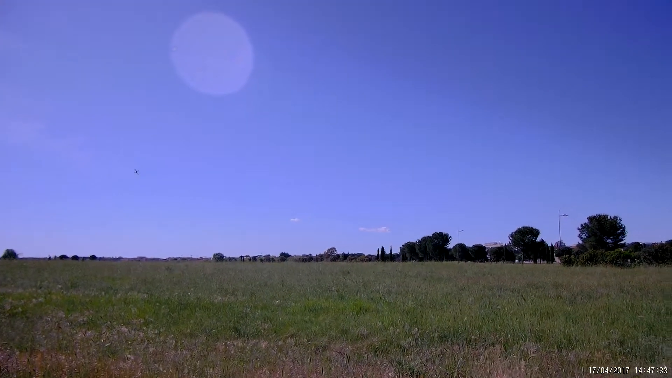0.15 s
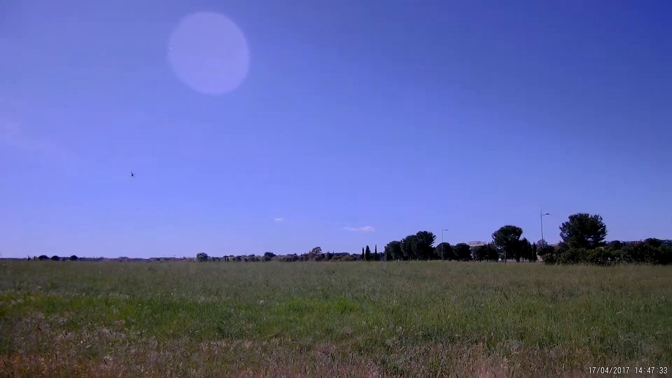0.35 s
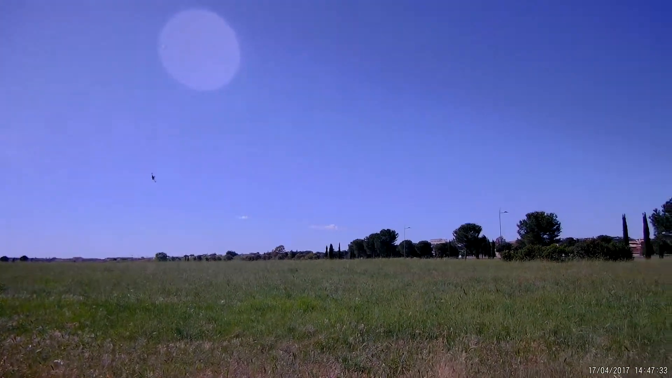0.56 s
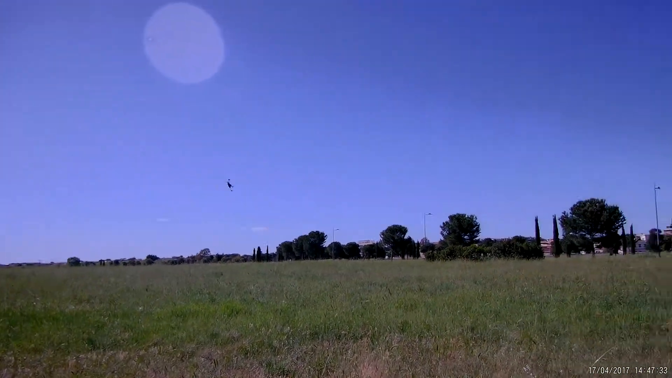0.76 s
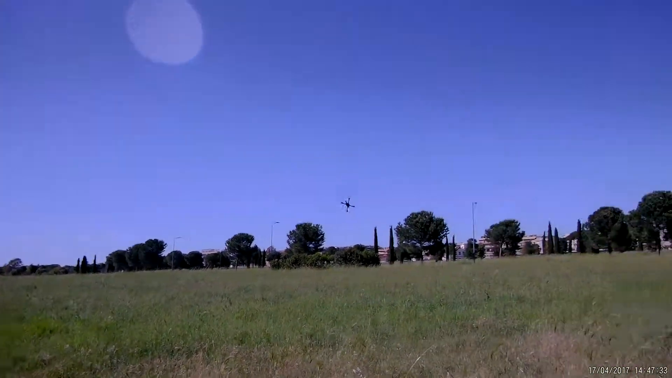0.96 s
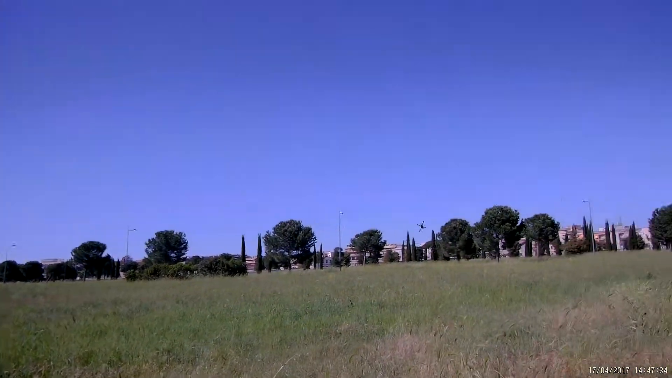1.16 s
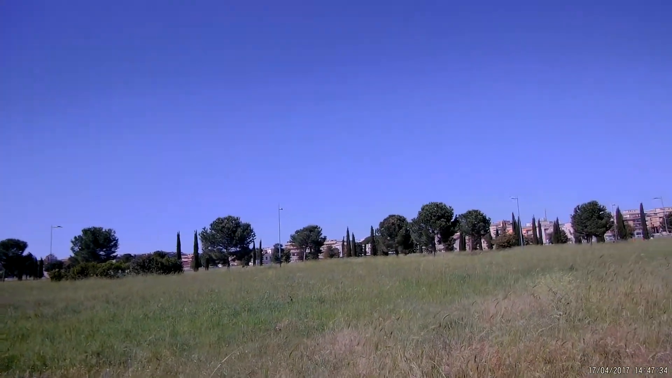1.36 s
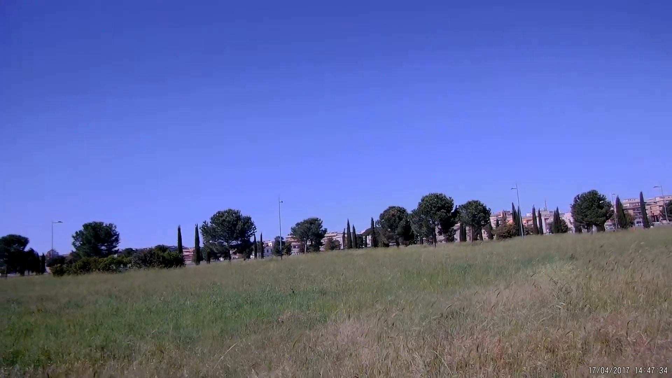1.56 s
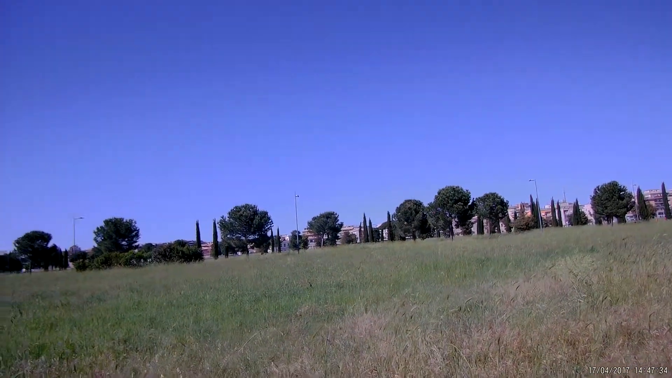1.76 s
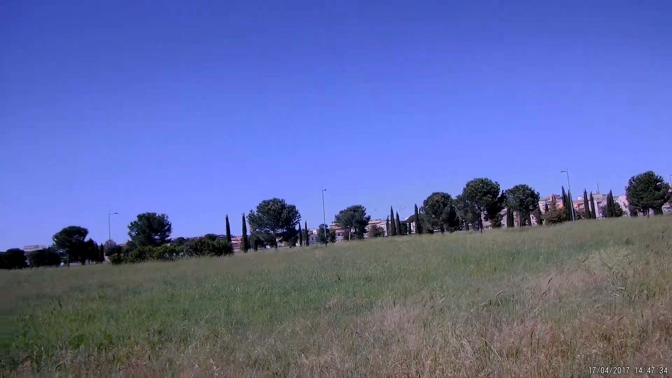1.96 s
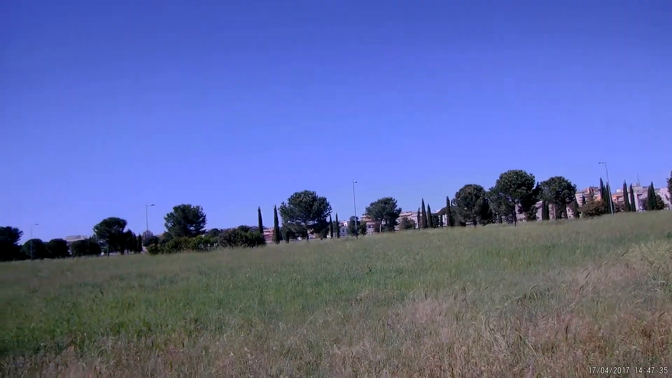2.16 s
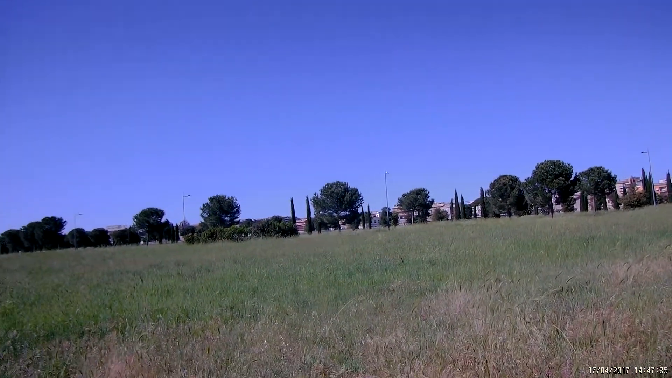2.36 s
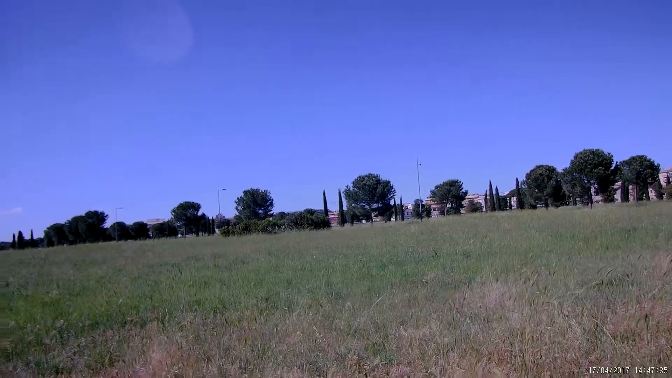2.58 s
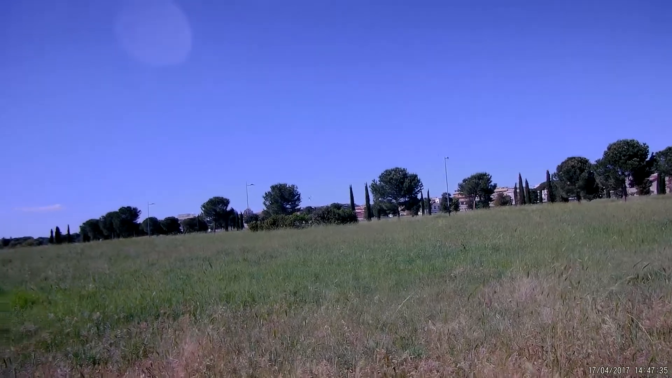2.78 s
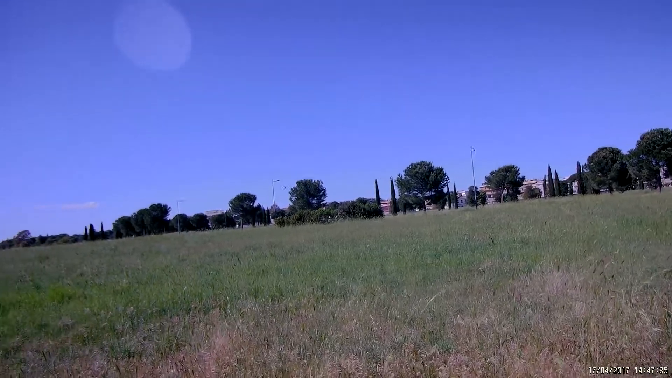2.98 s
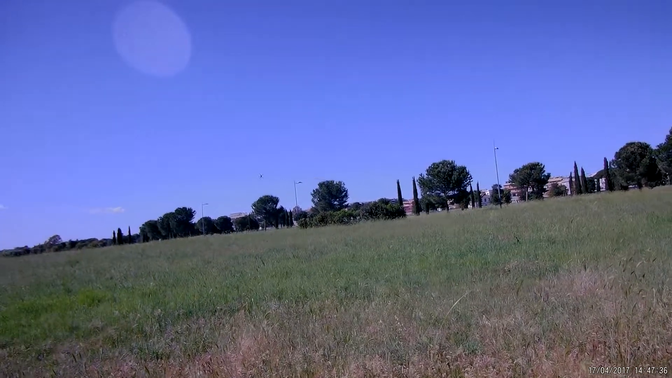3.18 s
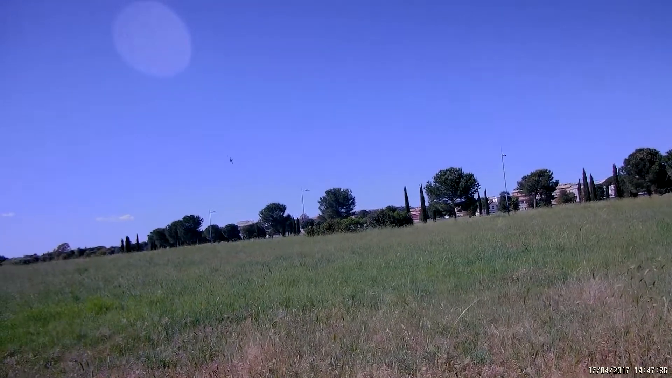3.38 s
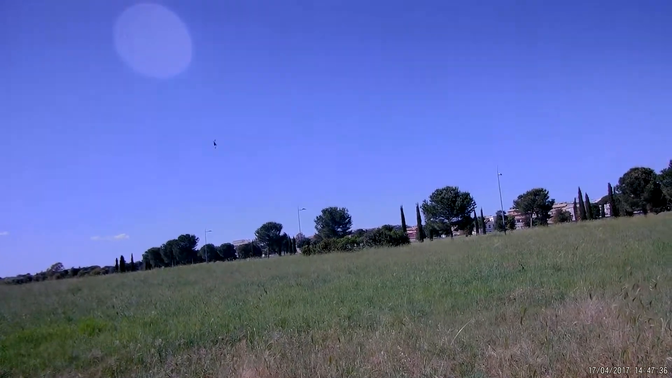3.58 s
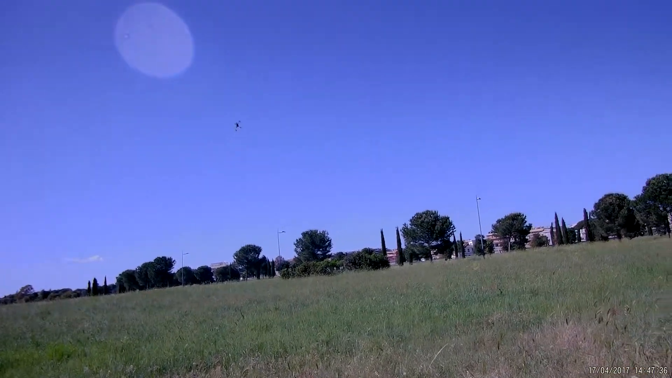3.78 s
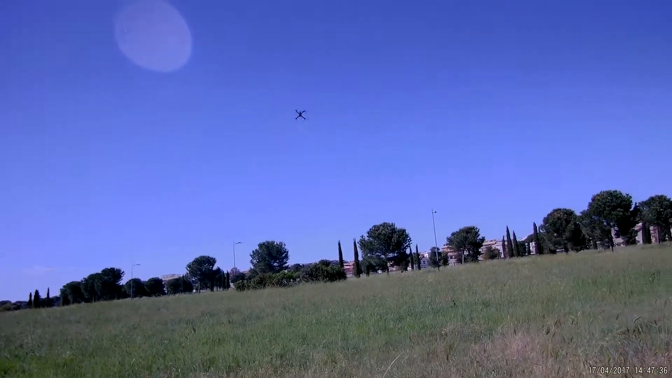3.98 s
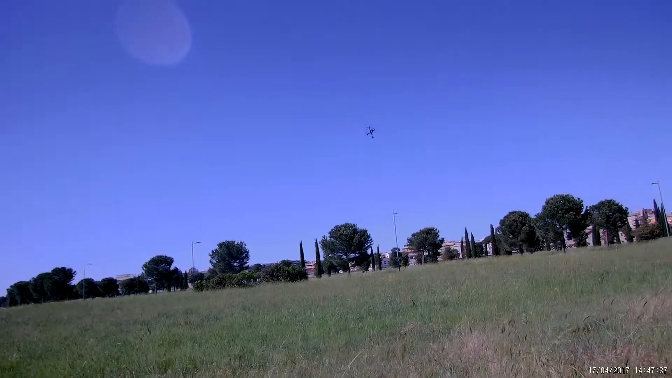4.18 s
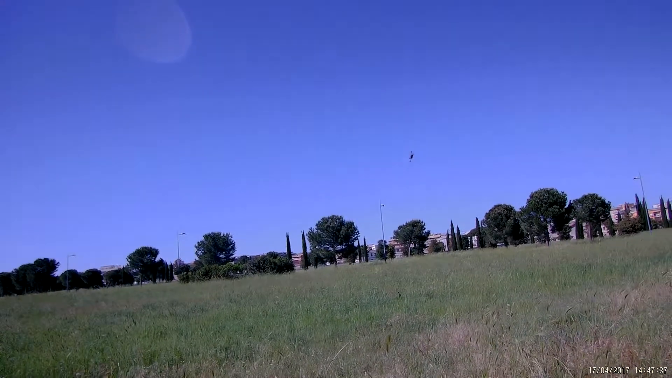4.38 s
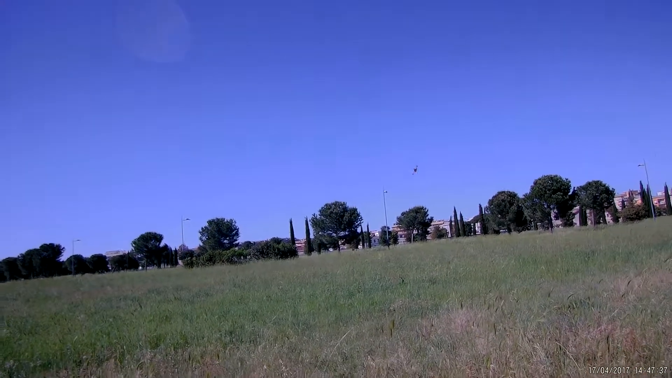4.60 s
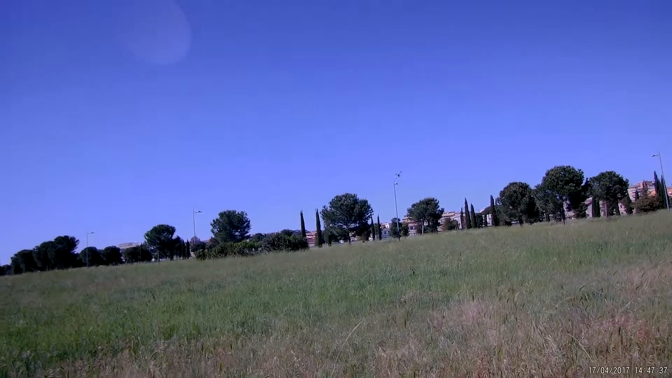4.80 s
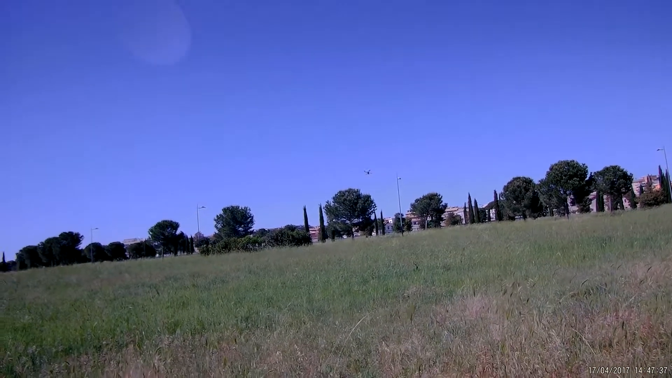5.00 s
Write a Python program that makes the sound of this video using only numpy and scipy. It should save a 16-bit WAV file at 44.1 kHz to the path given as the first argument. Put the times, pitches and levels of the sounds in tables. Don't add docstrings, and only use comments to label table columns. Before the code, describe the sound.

A distant, thin drone buzz swells quickly into a harsh close pass, then slides down in pitch. Rough, beating propeller tones and chopped airy wash continue farther away, dip almost to nothing, and surge into a second, lower pass before receding. Open air, no echo, near-mono small camera microphone with slightly notched treble and soft wind rumble.

```python
import sys
import numpy as np
from scipy import signal
from scipy.fft import rfft, irfft, next_fast_len
from scipy.io import wavfile
from scipy.ndimage import uniform_filter1d

SR = 44100
rng = np.random.default_rng(int(sys.argv[2]) if len(sys.argv) > 2 else 0)


def to_linear_factor(level_db):
    exponent = np.asarray(level_db, float) / 20
    return 10 ** exponent


def master(y):
    cut = np.clip(np.atleast_2d(y).T, -1, 1)
    pcm = np.round(cut * 32767)
    wavfile.write(sys.argv[1], SR, pcm.astype(np.int16))


N = 222352
FAST = next_fast_len(N)

# [t/s, nearness as tip hiss level/dB, discs tilted to camera/dB, discs edge-on/dB]
FLIGHT = [(0, -69, 5, -5), (.3, -66, 6.5, 0), (.45, -58, 0, -10), (.68, -56.5, -1, 1.5),
          (.92, -45, 1.5, 8.5), (1.07, -47.5, 0, -0.5), (1.43, -47.5, -3.5, -3), (1.55, -52.5, -0.5, -2),
          (2.0, -53.5, -1, -0.5), (2.35, -52.5, -6, 3.5), (2.7, -53, -6, -17), (3.2, -57.5, -5.5, -6.5),
          (3.59, -66.5, 3, -6), (3.71, -50.5, 3.5, -2), (3.92, -44.5, 3, -4), (4.15, -41.5, 0, -5),
          (4.5, -57.5, 0.5, -1.5), (5.04, -57.5, 1, -10.5)]
# [t/s, first rotor's favour in high harmonics/dB, depth of the narrow dips/0-1, blade
# load/dB, flying through its own wake/dB]
CHANGES = [(0, 3, 0.7, -6.5, 3), (.55, 12, 1, -7.5, 2), (.9, -4.5, 0.47, -1.5, -1.5), (1.15, -5, 0.7, -7.5, 2),
           (1.5, 1, 0.96, -4.5, -1.5), (1.85, 3, .95, 3, 6), (2.3, 6, 1, 1.5, 3), (2.7, 15, 0.5, -4, 3),
           (3.1, 14, 0.92, -17, 2), (3.55, -2, 0.74, -3.5, 3), (3.75, -17, 0.72, -1, 0.5),
           (4.18, 4, .3, -4.5, 0), (4.42, 2, .96, -8, 0.5), (5.04, 22, 0.96, -4.5, 1)]


def unit(x):
    return x / np.sqrt(np.mean(x ** 2) + 1e-20)


def curves(rows):
    times, *columns = np.transpose(rows)
    t = np.arange(N) / SR
    return np.array([np.interp(t, times, column) for column in columns])


def swells(rows):
    t = np.arange(N) / SR
    return sum(height * np.exp(-((t - s) / half) ** 2) for s, height, half in rows)


def wobble(rate, count=1):
    knots = rng.standard_normal((count, 2000))[:, :int(rate * N / SR)]
    return signal.resample(knots, FAST, axis=1)[:, :N]


def rush(spectrum, patchy_db):
    z = signal.stft(rng.standard_normal(N + 512), nperseg=512)[2]
    patches = uniform_filter1d(rng.standard_normal(z.shape), 10, axis=0)
    patches = uniform_filter1d(patches, 6, axis=1)
    noise = signal.istft(z * to_linear_factor(patchy_db * unit(patches)), nperseg=512)[1][:N]
    hz, db = np.transpose(spectrum)
    grid = np.fft.rfftfreq(FAST, 1 / SR)
    colour = to_linear_factor(np.interp(np.log(grid + 1), np.log(hz), db, -120, -120))
    return irfft(rfft(noise, FAST) * colour, FAST)[:N]


def blade_phase(speed_hz):
    hunting = 0.002036 * wobble(25, count=4) + 0.0035 * wobble(14, count=4)
    hz = speed_hz * (1 + hunting)
    return 2 * np.pi * (np.cumsum(hz, axis=1) / SR + rng.random((4, 1)))


def partial(phase, multiple, level_db, rough):
    rate = min(60 + 22 * multiple, 170)
    scatter = 1 + rough * (wobble(rate, count=4) + 1j * wobble(rate, count=4))
    tone = np.imag(scatter * np.exp(1j * multiple * phase))
    tone *= np.sqrt(2 / (1 + 2 * rough ** 2))
    return np.sum(to_linear_factor(level_db) * tone, axis=0)


def share(db):
    return db - 10 * np.log10(np.sum(to_linear_factor(db) ** 2, axis=0))


def rotor_tones(phase, blade_db, bite_db):
    # [multiple of the blade tone, level/dB]
    whine = [(5, -3), (6, 0), (7, 4), (8, -5)]
    # [t/s, swell/dB, half length/s]
    passes = [
        (.2, 8.5, 0.56),
        (1.02, 27, 0.29),
        (4.0, 13.5, 0.36),
    ]
    near_db, tilt_db, edge_db = curves(FLIGHT)
    favour_db, _, load_db, _ = curves(CHANGES)

    octave_db = blade_db + bite_db + 1.3 * wobble(22, count=4)
    first_only = np.array([[1], [0], [0], [0]])
    lead_db = near_db + share(0.82 * blade_db + 0.85 * octave_db + favour_db * first_only)
    uneven_db = np.array([[0], [0], [9], [0]])
    shaft_db = -82.5 + swells(passes) + share(blade_db + uneven_db)
    whine_db = lead_db - 14 - 1.42 * tilt_db + 0.79 * load_db

    out = partial(phase, 1, blade_db, rough=0.2)
    out += partial(phase, 2, octave_db, rough=0.36)
    out += partial(phase, 3, lead_db + edge_db, rough=0.5)
    out += partial(phase, 4, lead_db + load_db, rough=0.6)
    out += partial(phase, 1 / 2, shaft_db, rough=0.18)
    out += partial(phase, 3 / 2, shaft_db + 5.5, rough=1.0)
    out += partial(phase, 5 / 2, shaft_db - 0.5, rough=0.77)
    for multiple, db in whine:
        out += partial(phase, round(multiple), whine_db + db, rough=0.85)
    return out


def blade_puffs(phase):
    strength_db = 0.3 * wobble(29.95, count=4)
    return unit(sum(np.exp(0.38 * np.cos(p)) * to_linear_factor(db) for p, db in zip(phase, strength_db)))


def chopped_air(phase):
    # [f/Hz, level/dB per Hz]
    wash_colour = [(250, -47), (450, -9.5), (900, -0.5), (2200, -5.5), (2750, -3.5), (3300, -15.5),
                   (4400, -5), (6000, -18.5)]
    # [f/Hz, level/dB per Hz]
    hiss_colour = [(2500, -38), (3400, -19), (4300, -12.5), (5600, -1), (7600, 4.5), (9400, -7.5),
                   (11300, 5.5), (13000, 0.5), (15000, -3), (15800, 8)]
    # [t/s, swell/dB, half length/s]
    gusts = [
        (1.222, 6.5, 0.01),
        (1.25, 3.5, 0.039),
        (1.39, 2.5, 0.024),
        (2.1, 3, .035),
        (2.21, 4, 0.047),
        (2.6, 2, 0.033),
    ]
    hiss_db, top_db, _ = curves(FLIGHT)
    wake_db = curves(CHANGES)[3]
    gust_db = swells(gusts) + 0.11 * wobble(15)[0] + 0.37 * wobble(45)[0]

    wash = unit(blade_puffs(phase) * rush(wash_colour, patchy_db=1.5))
    hiss = blade_puffs(phase) * rush(hiss_colour, patchy_db=2.0)
    highpass = signal.butter(4, 9500, "high", fs=SR, output="sos")
    top = signal.sosfiltfilt(highpass, hiss)
    low = hiss - top
    tip_hiss = to_linear_factor(hiss_db - 1.7) * (unit(low) + to_linear_factor(top_db) * unit(top))
    return to_linear_factor(gust_db) * (to_linear_factor(hiss_db + wake_db) * wash + tip_hiss)


def breeze():
    # [f/Hz, level/dB per Hz]
    rumble_colour = [(12, -36), (20, -3.5), (65, -0.5), (125, -10), (195, -11.5), (246, -10.5),
                     (330, -11.5), (430, -4.5), (730, -120)]
    # [t/s, swell/dB, half length/s]
    stronger = [
        (2.22, 2, 0.15),
        (3.36, 3, 0.12),
    ]
    rumble = unit(to_linear_factor(1.24 * wobble(11)[0]) * rush(rumble_colour, patchy_db=2.5))
    return to_linear_factor(-69.5 + swells(stronger)) * rumble


def scene():
    # [t/s, blade passing f/Hz, blade tone level/dB, bite: first overtone against the tone/dB]
    front_left = [(0, 622, -64.5, -1.5), (.28, 613, -55.5, -4.5), (.51, 672, -52, -17),
                  (.77, 708, -36.5, -8), (1.02, 682, -23.5, -6), (1.19, 660, -40.5, -13.5),
                  (1.36, 630, -66.5, 23), (1.55, 612, -52.5, -6), (2.15, 586, -59, 6.5),
                  (2.82, 656, -51.5, -5.5), (3.15, 573, -51.5, -1), (3.5, 570, -65.5, -3),
                  (3.66, 617.8, -45.5, -5), (3.84, 645, -41.5, 0), (4.05, 600, -35, -6),
                  (4.3, 531, -56, -2), (4.6, 534, -71.5, 10), (5.04, 497, -61.5, -8)]
    front_right = [(0, 630, -57, -21), (0.278, 625, -57, -11), (.45, 695, -45, -15.5),
                   (.83, 741, -36.5, -7), (1.018, 701, -38, -7), (1.202, 632, -47, 3.5),
                   (1.45, 604, -52, 6), (1.681, 544, -51.5, -7.5), (2.0, 553, -41.5, -24),
                   (2.399, 577, -44.5, -16.5), (2.8, 614, -51, -11), (3.06, 567, -47.5, -18),
                   (3.5, 558, -63, -7), (3.739, 558, -43, -7), (4.131, 560.9, -42, 8.5),
                   (4.33, 513, -44, -6), (4.52, 527, -58.5, -13), (5.04, 405, -60, 0)]
    rear_left = [(0, 606, -58, -6), (0.281, 595.5, -63.5, -5), (0.448, 634, -54, -20),
                 (0.822, 673, -36, -15), (1.019, 649.5, -32.5, -11), (1.199, 601, -44, -11.5),
                 (1.45, 576.7, -57.5, 5), (1.7, 521, -46.5, -23), (1.87, 524.4, -52, -13),
                 (2.121, 481, -51, -27.5), (2.32, 512.6, -55, -20), (2.799, 577.6, -52, -33),
                 (3.099, 518, -55.5, -8), (3.45, 528, -62.5, -6), (3.8, 483.2, -46, -7.5),
                 (4.12, 451.2, -46.5, -2.5), (4.328, 470.7, -76.5, -7), (5.04, 424, -75, 11)]
    rear_right = [(0, 562, -66.5, -11), (0.299, 563.6, -58.5, -6), (0.449, 609, -54.5, 0.5),
                  (0.719, 643, -46, -25), (0.851, 623.5, -42, -8.5), (1.3, 483.7, -48.5, -3.5),
                  (1.47, 423, -67.5, -23), (1.85, 444, -53.5, -15), (2.3, 448, -55.5, -5),
                  (2.57, 513, -54, -7), (2.902, 512.6, -53.5, -12), (3.15, 455, -57, -14),
                  (3.4, 458.7, -60, -3), (3.581, 432, -74.5, -9.5), (3.9, 426.3, -45.5, -7),
                  (4.049, 452.7, -50.5, 3), (4.25, 433.8, -65.5, 12), (5.04, 395, -63, -25)]
    # [t/s, speed kick/Hz, tone swell/dB, half length/s]
    kicks = [
        [(1.45, 16, 9, 0.04986), (1.63, -15.5, 0, 0.058), (2.21, 10, 6, .05), (2.7, 13, -4, 0.077),
         (4.17, 13, 5, 0.056), (4.69, -17, -9, 0.078)],
        [(.09, 8.5, 1.5, 0.052), (.68, 12.5, -2.5, 0.048), (.94, 5.5, -9, 0.038), (1.36, 0.5, -22, 0.047),
         (1.57, 0, -22, 0.079), (1.79, 16, 3, .06), (3.93, -11.5, 0, 0.095), (4.02, 0, 1.5, 0.055),
         (4.2, 6, 2, 0.0492)],
        [(.15, 10.5, -2, 0.067), (.58, -9, -9, 0.076), (1.3, 9.5, 5, 0.06), (1.53, -0.5, 3.5, .08),
         (2.72, -8.5, -6, .05), (3.58, -8.5, -13, 0.0708), (4.6, 12, 5, .1)],
        [(.17, 6.5, 6, 0.051), (.26, 0.5, -9, .04), (1.55, 0, -15, 0.028), (2.12, -9, 1, 0.096),
         (3.74, 9.5, 5, 0.053), (3.83, -14, 2, .04), (4.6, -1.5, -6.5, 0.11)],
    ]
    rotors = (front_left, front_right, rear_left, rear_right)
    speed_hz, blade_db, bite_db = np.stack([curves(rows) for rows in rotors], axis=1)
    kick_hz = np.array([swells(np.array(rows)[:, [0, 1, 3]]) for rows in kicks])
    kick_db = np.array([swells(np.array(rows)[:, [0, 2, 3]]) for rows in kicks])

    phase = blade_phase(speed_hz + kick_hz)
    tones = rotor_tones(phase, blade_db + kick_db, bite_db - kick_db / 2)
    return np.tile(tones + chopped_air(phase) + breeze(), (2, 1))


def band_limit(x):
    return signal.sosfilt(signal.butter(12, 15850, fs=SR, output="sos"), x)


def record(dry):
    # [f/Hz, width/Hz, depth/0-1]
    narrow_dips = [(2863, 227, 0.7), (3875, 210, 0.51), (10740, 1000, 0.22), (13100, 850, 0.6)]
    # [t/s, low f/Hz, high f/Hz]
    flecks = [(.245, 9700, 11000), (1.85, 5200, 6800), (2.13, 6300, 7600), (2.13, 11000, 12400),
              (2.155, 4200, 5500), (2.155, 6900, 9600), (4.45, 5700, 6900), (4.935, 6900, 8200),
              (4.935, 11000, 12400)]
    hz, t, z = signal.stft(dry[0], SR, nperseg=1024)
    shade = np.interp(t, *np.transpose(CHANGES)[[0, 2]])
    flicker = uniform_filter1d(rng.standard_normal(z.shape), size=7, axis=0)
    flicker = unit(uniform_filter1d(flicker, size=3, axis=1))
    dips = sum(depth / (1 + (2 * (hz - centre) / width) ** 4) for centre, width, depth in narrow_dips)
    gain = np.clip(1 - dips[:, None] * (shade + 0.36 * flicker), 0.02, 1)
    heard = z * gain * (hz < 15760)[:, None]
    mono = signal.istft(heard, nperseg=1024)[1][:N]

    apart = sum(np.outer((lo < hz) & (hz < hi), abs(t - s) < 0.013) for s, lo, hi in flecks)
    late = np.roll(heard, 4, axis=1)
    side = to_linear_factor(-2) * signal.istft(late * apart, nperseg=1024)[1][:N]
    return band_limit(np.array([mono + side, mono - side]))


dry = scene()
out = record(dry)
master(out)
```